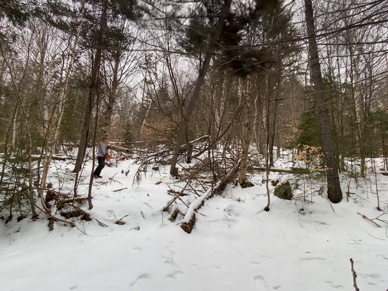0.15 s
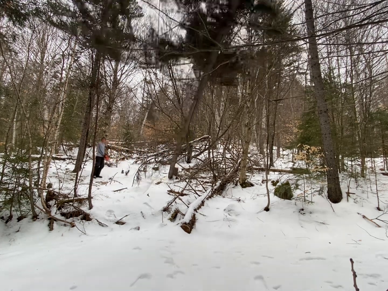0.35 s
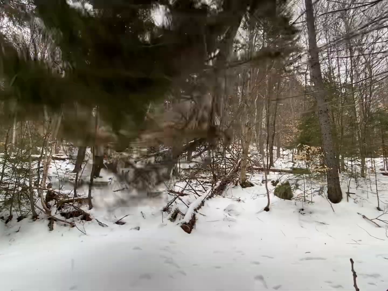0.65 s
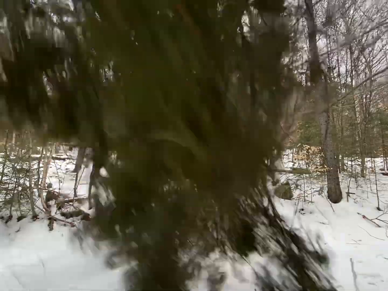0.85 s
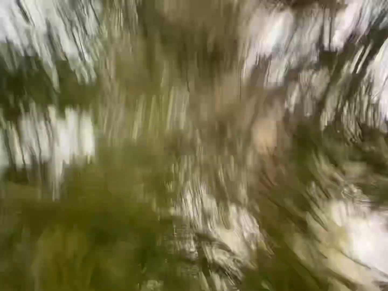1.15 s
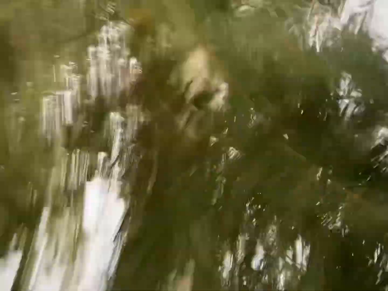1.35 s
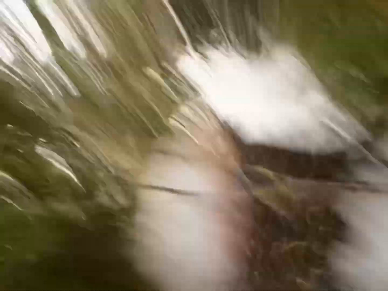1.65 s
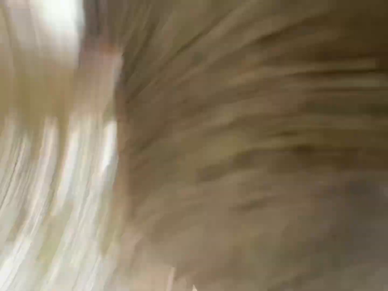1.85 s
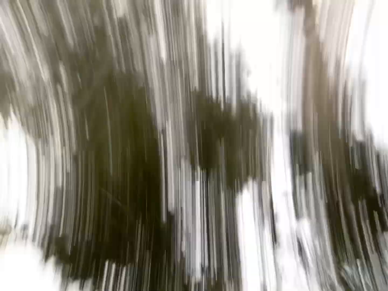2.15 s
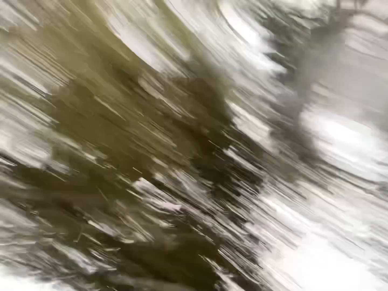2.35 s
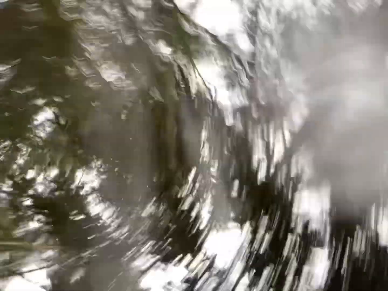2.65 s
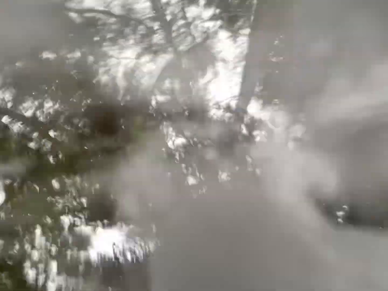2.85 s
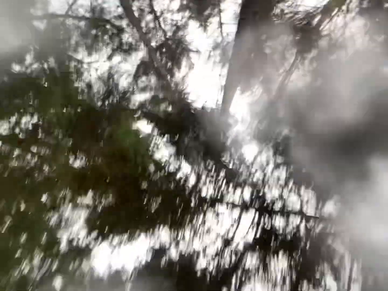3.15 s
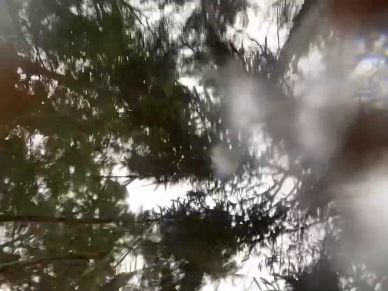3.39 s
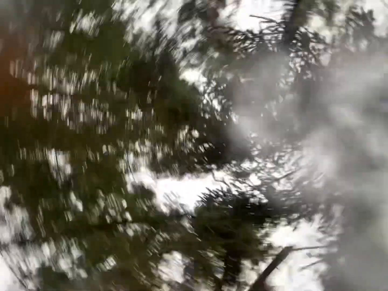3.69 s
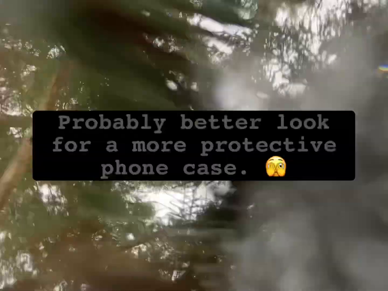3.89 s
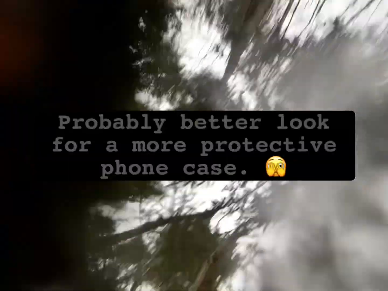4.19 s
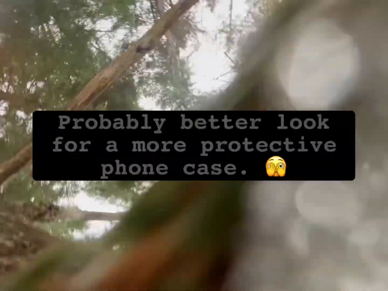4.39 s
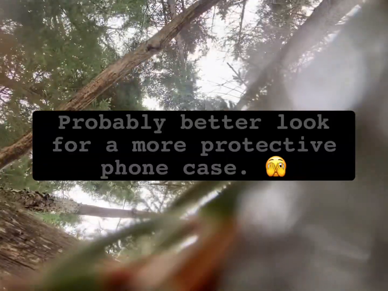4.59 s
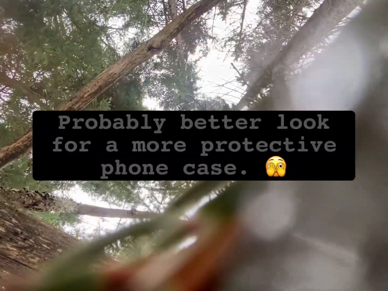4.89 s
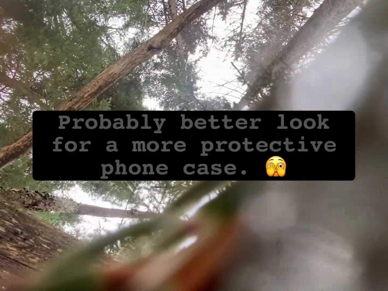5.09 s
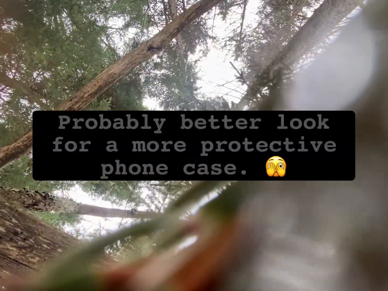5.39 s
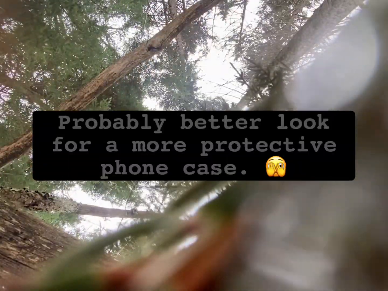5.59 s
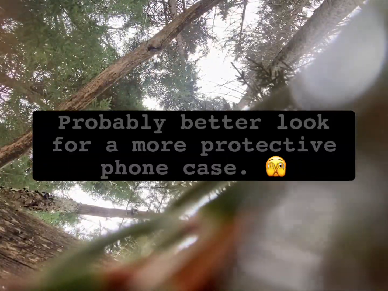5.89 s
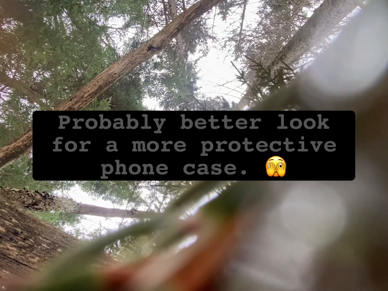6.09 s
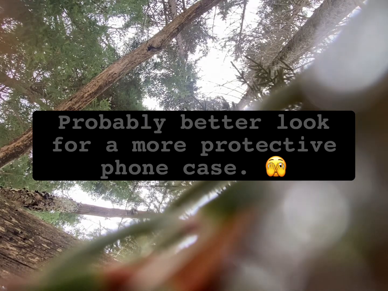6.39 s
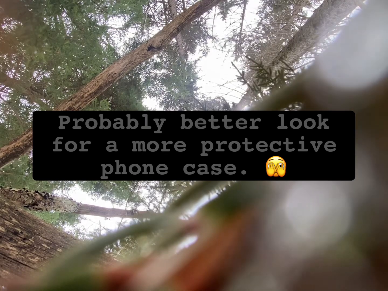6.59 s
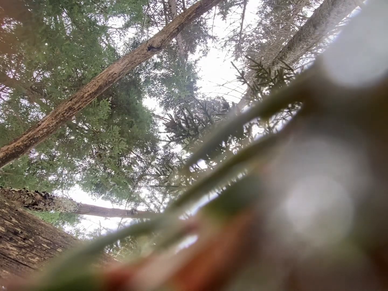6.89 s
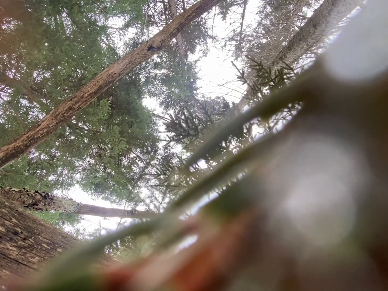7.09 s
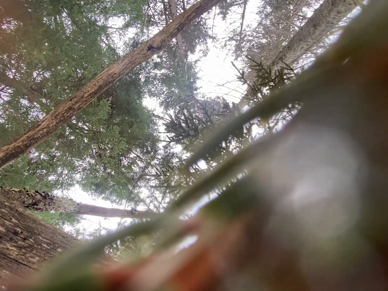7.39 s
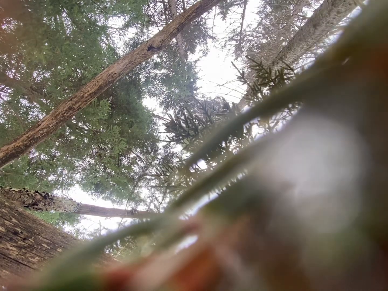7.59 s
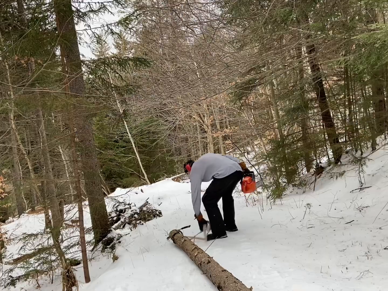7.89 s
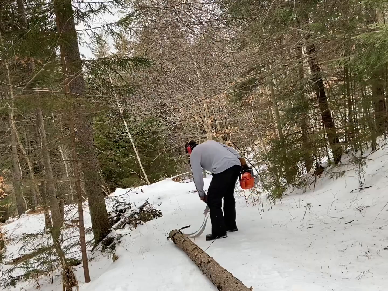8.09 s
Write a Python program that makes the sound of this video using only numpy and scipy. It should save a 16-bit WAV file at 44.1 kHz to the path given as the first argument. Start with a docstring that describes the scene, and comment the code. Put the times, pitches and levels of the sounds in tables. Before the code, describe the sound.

A falling tree snaps and rushes onto the microphone, its twigs knocking, scraping and crunching close by, then pattering out into near silence.

```python
"""Felled conifer crashing onto a camera in snow

Limbs crack as decaying noise bursts and the needles swish closer as coloured noise and grains.
Boughs knock on the case as falling tones; twigs and snow scrape and crunch as stick-slip grains.
The last twigs patter as they settle, then the scene cuts to another, faint outdoor murmur of noise."""
import sys
import numpy as np
from scipy import signal
from scipy.fft import rfft, irfft, next_fast_len
from scipy.io import wavfile
from scipy.ndimage import uniform_filter1d, map_coordinates

SR = 44100
rng = np.random.default_rng(int(sys.argv[2]) if len(sys.argv) > 2 else 0)


def materialize(psi):
    """Save the field psi as 16-bit PCM at rate SR to the path in sys.argv[1].

    A 1-D psi becomes a single channel; in a 2-D psi each row is a channel.
    """
    bounded = np.clip(np.atleast_2d(psi).T, -1, 1)
    quanta = np.round(bounded * 32767).astype(np.int16)
    wavfile.write(sys.argv[1], SR, quanta)


N = 363808

# needles sweeping through the air, louder as the crown nears: time_s, relative_level_db
CROWN_SWISH = [(0.77, -46.5), (1.0, -47), (2.28, -39.5), (2.65, -30.5), (2.95, -31), (3.44, -21),
               (3.52, -29), (4.035, -29.5), (4.07, -42.5), (4.65, -41), (4.85, -42.5)]
# spectra, scaled to unit energy in use: frequency_hz, relative_density_db
BOUGH_SPECTRUM = [(40, -16.5), (110, 1), (450, 2.5), (620, 0), (1300, 1), (3500, -7), (7000, -31)]
TWIG_SPECTRUM = [(500, -16.5), (1100, 0), (3400, -5), (5200, -1.5), (8200, -1), (11200, -7.5), (13300, -26),
                 (16000, -19)]
SHAKE_SPECTRUM = [(20, -46.5), (45, -2), (85, 6), (170, -2), (330, -5.5), (550, -16), (1200, -55.5)]
# start of settling; level of the faint murmur and of the last twigs from then on
SETTLE_S, LULL_DB = 6.97, -73.5


def amp(db):
    """Decibels to gain."""
    return 10 ** (np.asarray(db) / 20)


def unit(x):
    """x at rms 1."""
    return x / np.sqrt(np.mean(x ** 2) + 1e-20)


def along(points, hz):
    """(Hz, value) points read on a log axis."""
    point_hz, value = np.transpose(points)
    return np.interp(np.log(hz + 1), np.log(point_hz + 1), value)


def gains(rows, fade_s=0.023):
    """A gain per sample for each dB column, fading out beyond the rows."""
    time_s, *columns_db = np.transpose(rows)
    t = np.arange(N) / SR
    gate = np.clip(1 + np.minimum(t - time_s[0], time_s[-1] - t) / fade_s, 0, 1)
    return [gate * amp(np.interp(t, time_s, db)) for db in columns_db]


def swell(start_s, end_s, attack_s, release_s):
    """A gain that rises exponentially to 1 at start, holds until end, then dies away."""
    t = np.arange(N) / SR
    rise = np.minimum(t - start_s, 0) / attack_s
    fall = np.minimum(end_s - t, 0) / release_s
    return np.exp(rise + fall)


def burst(peak_s, attack_s, release_s):
    """A swell with no hold."""
    return swell(peak_s, peak_s, attack_s, release_s)


def sag(start_s, db_per_s):
    """A gain that falls steadily from start on."""
    return amp(-db_per_s * np.maximum(np.arange(N) / SR - start_s, 0))


def wobble(knots_per_s):
    """A smooth random curve through random knots."""
    knots = rng.standard_normal(int(N * knots_per_s / SR) + 4)
    return map_coordinates(knots, [np.arange(N) * knots_per_s / SR])


def noise():
    """White noise, one row per channel."""
    return rng.standard_normal((2, N))


def grains(per_s, spread_db):
    """Tiny fractures of unequal size at random moments, rms 1."""
    sizes = amp(spread_db * np.minimum(noise(), 2)) * np.sign(noise())
    return unit(sizes * (rng.random((2, N)) < per_s / SR))


def colour(x, spectrum, size=4096):
    """x through a minimum-phase filter of unit energy with this spectrum."""
    gain = amp(along(spectrum, np.fft.rfftfreq(size, 1 / SR)))
    cepstrum = irfft(np.log(np.maximum(gain, 1e-6)))
    # fold the cepstrum forward in time to make the filter causal
    cepstrum[1:size // 2] *= 2
    cepstrum[size // 2 + 1:] = 0
    response = irfft(np.exp(rfft(cepstrum)))
    return signal.fftconvolve(x, response[None] / np.linalg.norm(response), axes=1)[:, :N]


def mottle(x, depth_db, size=128):
    """No two fractures are alike: the colour changes at random every few milliseconds."""
    z = signal.stft(x, nperseg=size)[2]
    field = rng.standard_normal(z.shape[1:])
    field = uniform_filter1d(field, size=3, axis=0)  # over frequency
    field = uniform_filter1d(field, size=7, axis=1)  # over time
    return signal.istft(z * unit(amp(depth_db * unit(field))), nperseg=size)[1][:, :N]


def ports(pair, alike):
    """Two unrelated signals mixed into left and right with this correlation."""
    turn = np.arccos(alike) / 2
    mid, side = np.cos(turn) * pair[0], np.sin(turn) * pair[1]
    return np.array([mid + side, mid - side])


def pan(left_right_db):
    """Left and right gains of constant power."""
    return unit(amp([[left_right_db / 2], [-left_right_db / 2]]))


def add(track, start_s, sound):
    """Mix a sound into the track from start_s on."""
    i = round(start_s * SR)
    track[:, i:i + sound.shape[-1]] += sound[..., :N - i]


def outdoors():
    """Low air, the quiet forest, foliage brushed by the crown; then a cut to another faint murmur."""
    # spectra: frequency_hz, relative_density_db
    rumble_spectrum = [(20, -37), (55, 1), (105, -6.5), (220, -22), (500, -46)]
    forest_spectrum = [(59, -29.5), (100, 8), (280, -13.5), (608, -26.5), (1800, -24.5), (11600, -16.5),
                       (16000, -28.5)]
    murmur_spectrum = [(80, -10), (200, 1), (500, 1), (1100, -7), (2500, -15.5), (7000, -16.5),
                       (12000, -23), (13500, -36)]
    still_air_db, pushed_air_db, push_exponent = -83, -61, 0.9
    low_rise_s, cut_s, after_cut_db = 7.575, 7.86, -65.5
    end_s = N / SR

    crown, = gains(CROWN_SWISH)
    pushed = amp(pushed_air_db) * (crown / crown[SR]) ** push_exponent  # relative to the swish at 1 s
    pushed = pushed + amp(-53) * swell(.77, 1.15, attack_s=.005, release_s=.05)
    late_low = amp(-61.5) * swell(low_rise_s, end_s, attack_s=0.034, release_s=.1)
    air = amp(still_air_db) + pushed + late_low
    low = air * colour(ports(noise(), alike=0.94), rumble_spectrum)
    quiet = amp(-83.5) * colour(noise(), forest_spectrum)

    # the level jumps within some 12 ms at the cut
    after_cut = amp(after_cut_db + 2 * wobble(35)) * swell(cut_s, end_s, attack_s=.012, release_s=.1)
    lull = amp(LULL_DB) * swell(SETTLE_S, end_s, attack_s=0.085, release_s=.1)
    rustle = ports(noise() + .9 * grains(per_s=300, spread_db=4), alike=.5)
    murmur = unit(colour(rustle, murmur_spectrum))

    # the toppling crown brushes its neighbours, still far off
    brush = amp(-73.5) * burst(0.462, attack_s=0.018, release_s=0.088)
    brushed = colour(noise(), TWIG_SPECTRUM) + colour(noise(), SHAKE_SPECTRUM)
    return low + quiet + (after_cut + lull) * murmur + brush * brushed


def scuff():
    """One short, dry scuff in the snow: a burst of dense grains."""
    crunch = ports(grains(per_s=2500, spread_db=3), alike=.6)
    level = amp(-49.5) * burst(7.966, attack_s=.005, release_s=.012)
    return level * colour(crunch, [(600, -16), (1200, 0), (2800, -2), (4200, -20)])


def settling():
    """The last twigs patter as thin grains, and the boughs stop rocking as they come to rest."""
    # spectrum of the patter: frequency_hz, relative_density_db
    patter_spectrum = [(900, -8.5), (1600, -10.5), (2000, 2), (2600, -8.5), (6000, -14.5), (13000, -24.5)]
    level = amp(-53.5) * swell(SETTLE_S, 7.23, attack_s=0.016, release_s=0.05)
    level = level * sag(SETTLE_S, db_per_s=22)
    twigs = grains(per_s=90, spread_db=4) + .15 * noise()
    patter = mottle(colour(twigs, patter_spectrum), depth_db=3)

    late = amp(LULL_DB) * swell(SETTLE_S, N / SR, attack_s=.02, release_s=.1)
    stragglers = late * colour(grains(per_s=45, spread_db=4), TWIG_SPECTRUM)

    rock = amp(-49) * burst(SETTLE_S, attack_s=0.044, release_s=0.12)
    rocking = rock * colour(ports(noise(), alike=-0.47), SHAKE_SPECTRUM)
    return rocking + level * patter + stragglers


def squeak():
    """Wet bark squeals faintly and hoarsely as it slides: an unsteady tone with one overtone."""
    # squeals: start_s, end_s, relative_level_db
    squeals = [(3.705, 3.765, -42), (3.845, 3.93, -34.5)]
    pitch_hz, rise_s, fall_s = 1770, .03, .02
    level = sum(amp(db) * swell(start_s, end_s, rise_s, fall_s) for start_s, end_s, db in squeals)
    phase = 2 * np.pi * np.cumsum(pitch_hz * (1 + .004 * wobble(200))) / SR
    hoarseness = unit(amp(3 * wobble(110)))
    return level * hoarseness * (np.sin(phase) + .3 * np.sin(2 * phase))


def swish():
    """Countless needles brush past each other, small twigs crackle among them; single boughs whip by."""
    # spectrum of the hiss: frequency_hz, relative_density_db
    needle_spectrum = [(1200, -17.5), (2300, 1), (7000, 3.5), (11500, 3.5), (13000, -6.5), (16000, -1.5)]
    # single boughs whipping past: middle_s, half_length_s, body_db, hiss_db (relative levels)
    sweeps = [(2.578, 0.044, -35.5, -26), (2.748, 0.034, -26, -27.5), (3.448, 0.01, -38, -18.5)]
    # the boughs' body under the hiss thins once they have passed
    body_db, thinning_from_s, thinning_db_per_s = -1.5, 2.05, 4

    t = np.arange(N) / SR
    hiss, = gains(CROWN_SWISH, fade_s=0.005)
    body = hiss * amp(body_db) * sag(thinning_from_s, thinning_db_per_s)
    for middle_s, half_s, sweep_body_db, sweep_hiss_db in sweeps:
        passing = np.exp(-((t - middle_s) / half_s) ** 2 / 2)
        body = np.hypot(body, amp(sweep_body_db) * passing)
        hiss = np.hypot(hiss, amp(sweep_hiss_db) * passing)

    rush = noise() + 0.28 * grains(per_s=950, spread_db=-2)
    boughs = colour(ports(rush, alike=0.32), BOUGH_SPECTRUM)
    crackle = noise() + .5 * grains(per_s=1500, spread_db=10)
    needles = colour(ports(crackle, alike=.1), needle_spectrum)
    sway_gain = amp(1.0 + 1.4 * wobble(16))
    crown = body * unit(boughs) + hiss * sway_gain * unit(needles)
    return mottle(crown, depth_db=2.0)


def echo(x, size=256):
    """The trunks scatter sound back; each frequency dies at its own speed."""
    # reverberation among the trunks: frequency_hz, t60_s
    trunk_decay = [(200, .25), (2000, .34), (12000, .2)]
    hz, t, z = signal.stft(rng.standard_normal((2, SR // 2)), SR, nperseg=size)
    decay = amp(-60 * t / along(trunk_decay, hz)[:, None])
    tail = signal.istft(z * decay, SR, nperseg=size)[1]
    return signal.fftconvolve(x, tail / np.linalg.norm(tail[0]), axes=1)[:, :N]


def cracks(rows, t60_s, splinter_db, splinter_t60_s, alike):
    """Each break is a sharp crack followed by a short tearing of fibres, both decaying noise."""
    # spectrum of breaking wood: frequency_hz, relative_density_db
    wood_spectrum = [(80, -15), (200, -14), (700, -4.5), (1400, -0.5), (3000, -6.5), (10000, -9),
                     (16000, -18.5)]
    track, t = np.zeros((2, N)), np.arange(SR // 8) / SR
    for start_s, db in rows:
        draw = rng.standard_normal((2, 2, len(t)))
        crack = amp(-60 * t / t60_s) * draw[0]
        tearing = amp(splinter_db - 60 * t / splinter_t60_s) * unit(draw[1] ** 3)  # cubed: spiky
        add(track, start_s, amp(db) * ports(crack + tearing, alike))
    return colour(track, wood_spectrum)


def breaking():
    """Limbs snap and echo in the wood; small twigs tick close by with a faster decay."""
    # limbs breaking: start_s, relative_level_db
    snaps = [(.7555, -10.5), (.7865, -18.5), (.8695, -11), (1.065, -25), (2.539, -20.5), (2.734, -6),
             (2.767, -4.5), (2.797, 0), (2.804, -5), (3.422, -5)]
    # small twigs ticking near the case: start_s, relative_level_db
    ticks = [(3.62, -8.5), (3.886, -6.5), (4.807, -15.5), (5.071, -7), (5.415, -18), (5.787, -17),
             (6.189, -7.5), (6.287, -18.5), (6.411, -13), (7.241, -33.5), (7.379, -39.5), (7.686, -39),
             (7.749, -40)]
    limbs = cracks(snaps, t60_s=0.017, splinter_db=-21, splinter_t60_s=0.2, alike=0.2)
    limbs = mottle(amp(-6.5) * limbs, depth_db=1.5)
    twigs = cracks(ticks, t60_s=.005, splinter_db=-19, splinter_t60_s=.04, alike=.1)
    return limbs + amp(-5.0) * echo(limbs) + amp(-4) * twigs


def clonk():
    """Heavy limbs give way or strike a trunk: a dull, wooden rattle of dense grains."""
    # blows: peak_s, relative_level_db, decay_s
    clonks = [(0.869, -29, 0.008), (1.064, -33, 0.018), (2.707, -13.5, 0.0038), (2.730, -17, 0.011),
              (2.767, -24, 0.0069), (2.796, -22, 0.0057), (2.828, -24, 0.0026), (5.322, -23.5, .018)]
    level = sum(amp(db) * burst(peak_s, 0.0015, decay_s) for peak_s, db, decay_s in clonks)
    rattle = ports(grains(per_s=4000, spread_db=1), alike=.7)
    return level * colour(rattle, [(200, 2.0), (550, 3.0), (1150, 2.5), (2200, -13.0)])


def knocks():
    """A blow travels through springy wood, high notes first, so each knock falls in pitch."""
    # boughs on the case: start_s, relative_level_db, starting_pitch_hz, length_s, left_right_db
    blows = [(3.455, -18, 132, 0.05, 5.5), (3.486, -11.5, 727, 0.0085, 14), (3.564, -21, 1286, 0.0081, 6),
             (3.696, -20.5, 360, 0.018, 14), (3.914, -17, 1066, 0.016, 0), (4.007, -17, 230, 0.016, 14.5),
             (4.0365, -8, 1092, 0.012, -1), (4.191, -16, 1400, 0.008, 3), (4.284, -21, 1130, 0.0065, 0),
             (4.3606, -15, 1438, 0.0081, -8), (4.432, -27, 553, 0.03, 33),
             (4.685, -13.5, 1146, 0.0072, 0.5), (4.753, -20, 1000, 0.007, -6),
             (6.528, -20.5, 468, 0.025, 3.5), (6.587, -25.5, 510, .012, -0.5)]
    end_hz = 43.3  # the pitch towards which every knock falls
    track, t = np.zeros((2, N)), np.arange(SR // 6) / SR
    judder, rattle = wobble(450), np.zeros((2, N))
    for start_s, db, start_hz, length_s, left_right_db in blows:
        age = t / length_s
        rough = np.roll(judder, -round(start_s * SR))[:len(t)]  # bark catches unevenly on the case
        pitch_hz = end_hz + (start_hz - end_hz) / (1 + age) ** 2.6
        phase = 2 * np.pi * np.cumsum(pitch_hz) / SR + .7 * rough
        thump = (age / .42 * np.exp(1 - age / .42)) ** .8
        linger = .1 * (1 - np.exp(-age)) * np.exp(-age / 1.6)
        # the two ends of the case move a third of a cycle out of step
        wave = np.array([np.sin(phase), np.sin(phase + 2 * np.pi / 3)])
        add(track, start_s, amp(db + 4.0) * pan(left_right_db) * (thump + linger) * wave)
        add(rattle, start_s, amp(db) * pan(left_right_db) * np.exp(-t / 0.0074))
    return track + amp(-9.5) * colour(rattle * ports(noise(), alike=0.36), BOUGH_SPECTRUM)


def shell_ring(x):
    """The case rings higher or lower as the point of contact wanders over it."""
    # resonances of the case at mid pitch: frequency_hz, relative_density_db
    case_spectrum = [(80, -18), (160, -1), (330, 1.5), (480, -15.5), (600, -10), (690, 6.5), (860, -11),
                     (1050, -4.5), (1500, -12.5), (2300, -11.5), (4500, -34.5)]
    wander = .18  # share by which the ring shifts up and down
    place = wobble(30)
    ring = 0
    for k in (-1, 0, 1):
        shifted = [(hz * (1 + wander) ** k, db) for hz, db in case_spectrum]
        ring = ring + np.exp(-(place - k) ** 2) * colour(x, shifted)
    return .8 * ring


def scrapes():
    """A twig slips over the case in a swelling burst of tiny catches that also ring the shell."""
    # twigs flicking past: middle_s, relative_level_db, half_length_s, left_right_db
    flicks = [(3.479, -12.5, 0.0036, -15.5), (3.489, -8, 0.0021, -1.5), (3.566, -11.5, 0.00074, 9.5),
              (3.645, -10.5, 0.0042, -11.5), (4.043, -8, 0.0014, -12.5), (4.097, -10.5, 0.0016, -2.5),
              (4.366, -6.5, 0.00065, 8.5), (4.657, -11.5, 0.0023, -1.5), (4.687, -12.5, 0.0044, 12.5),
              (4.751, -12, 0.0011, 4), (4.902, -8, 0.00069, 15.5), (4.931, -11, 0.0031, 14.5),
              (4.969, -12, 0.0035, 8), (5.012, -11, 0.0025, 1), (5.031, -13, 0.0071, -3.5),
              (5.177, -16.5, 0.0012, 11.5), (5.359, -16.5, 0.0032, 1.5), (5.515, -16.5, 0.0017, 13.5),
              (5.583, -16, 0.0012, -2), (5.9294, -12, 0.0013, 12.5), (6.267, -11.5, 0.0018, 7.5),
              (6.311, -16.5, 0.005, -0.5), (6.343, -20, 0.0038, 11.5), (6.498, -9.5, 0.0012, 2.5),
              (6.53, -9.5, 0.0013, -12.5), (6.581, -7, 0.0015, -18.5), (6.614, -14, 0.0037, -19),
              (6.644, -16, 0.0028, -9), (6.664, -14.5, 0.0028, -7), (6.763, -12.5, 0.0011, -10)]
    force, t = np.zeros((2, N)), np.arange(SR // 10) / SR
    centre_s = t.mean()
    for middle_s, db, half_s, left_right_db in flicks:
        away = abs(t - centre_s) / half_s
        envelope = np.exp(-(away / 1.6) ** 2) + .3 * np.exp(-away / 3)
        add(force, middle_s - centre_s, amp(db) * pan(left_right_db) * envelope)
    catches = force * unit(2.0 * noise() + grains(per_s=2700, spread_db=3.5))
    shell = shell_ring(ports(catches, alike=-0.61))
    return amp(-4.0) * colour(catches, TWIG_SPECTRUM) + amp(-6.0) * shell


def drag():
    """Stick and slip on the case: a dense crunch of grains, and a groan that rocks the ports in opposition."""
    # boughs, twigs and snow dragging: start_s, end_s, groan_db, crunch_db, shake_db, left_right_db
    # (relative levels)
    strokes = [(3.824, 4.037, -40, -55.5, -20, 0.5), (4.109, 4.19, -35.5, -39.5, -22, -5),
               (4.257, 4.63, -46, -44, -33.5, -1.5), (4.629, 4.762, -47.5, -59, -24, 5),
               (4.888, 5.208, -37, -31.5, -27, 0), (5.248, 5.434, -30, -28, -31, -0.5),
               (5.49, 5.527, -29, -28.5, -40, 1), (5.604, 5.661, -33.5, -32, -31.5, 1),
               (5.724, 5.783, -37.5, -43.5, -38.5, 5.5), (5.943, 6.168, -43, -43.5, -36, 4.5),
               (6.174, 6.447, -28.5, -32.5, -28.5, 8), (6.516, 6.68, -28, -33, -26, 8),
               (6.69, 6.707, -23.5, -33.5, -30, 3), (6.77, 6.894, -33.5, -43.5, -26.5, 5.5)]
    # steady sliding between slips dwindles as the boughs slow down: time_s, share
    slide_share = [(5.4, .6), (5.75, .27)]
    slips_per_s, slip_decay_s = 280, 0.0014
    # a stroke grips, weakens as it slides, lets go
    attack_s, release_s, sag_db_per_s = 0.018, 0.034, 1.5

    # between strokes the boughs still creep over the case
    creep = amp(-52) * swell(4.7, 6.9, attack_s=0.044, release_s=0.017)
    groan, crunch, shake = creep * np.ones((3, 1, 1))
    for start_s, end_s, groan_db, crunch_db, shake_db, left_right_db in strokes:
        grip = swell(start_s, end_s, attack_s, release_s) * sag(start_s, sag_db_per_s)
        groan = np.maximum(groan, amp(groan_db) * grip)
        shake = np.maximum(shake, amp(shake_db) * grip)
        crunch = np.maximum(crunch, amp(crunch_db) * pan(left_right_db) * grip)

    # each slip starts at once, reaches both ports, and dies within a few milliseconds
    starts = abs(grains(per_s=slips_per_s, spread_db=3.5)[0])
    jerks = unit(signal.lfilter([1], [1, -np.exp(-1 / (slip_decay_s * SR))], starts))
    sliding = np.interp(np.arange(N) / SR, *np.transpose(slide_share))
    slip_rms = np.sqrt(1 + 2 * sliding * jerks.mean() + sliding ** 2)
    slips = (sliding + jerks) / slip_rms

    grit = unit(grains(per_s=4500, spread_db=3) + noise())
    bright = colour(slips * grit, TWIG_SPECTRUM)
    shell = shell_ring(ports(slips * grains(per_s=3000, spread_db=0.5), alike=-0.58))
    low = colour(ports(noise(), alike=-0.68), SHAKE_SPECTRUM)
    rocking = amp(4.5) * groan * shell + amp(-1.5) * shake * low
    return amp(2.0) * crunch * bright + mottle(rocking, depth_db=2.5)


def tilt(x):
    """Each port has its own colour for what rubs next to it; their summed power gain stays flat."""
    # balance of the two ports: frequency_hz, left_right_db
    port_balance = [(2000, 0), (4500, 6.5), (8000, 0), (13000, -9)]
    half_db = along(port_balance, np.fft.rfftfreq(N, 1 / SR)) / 2
    gain = amp([half_db, -half_db])
    return irfft(rfft(x) * gain / np.sqrt(np.mean(gain ** 2, axis=0)), N)


def scene():
    """The falling crown, everything that touches the case, and the outdoor background."""
    contact = tilt(mottle(scrapes(), depth_db=4) + mottle(drag(), depth_db=3.2))
    background = outdoors() + scuff() + settling()
    tree = swish() + breaking() + clonk()
    return background + tree + squeak() + knocks() + contact


def record(dry):
    """The camera rounds off the highest peaks and keeps nothing above its band limit."""
    top_hz = 16000
    held = dry / (1 + abs(dry) ** 6) ** (1 / 6)
    size = next_fast_len(N + SR // 2)
    passband = np.fft.rfftfreq(size, 1 / SR) < top_hz
    return irfft(rfft(held, size) * passband, size)[:, :N]


dry = scene()
out = record(dry)
materialize(out)
```